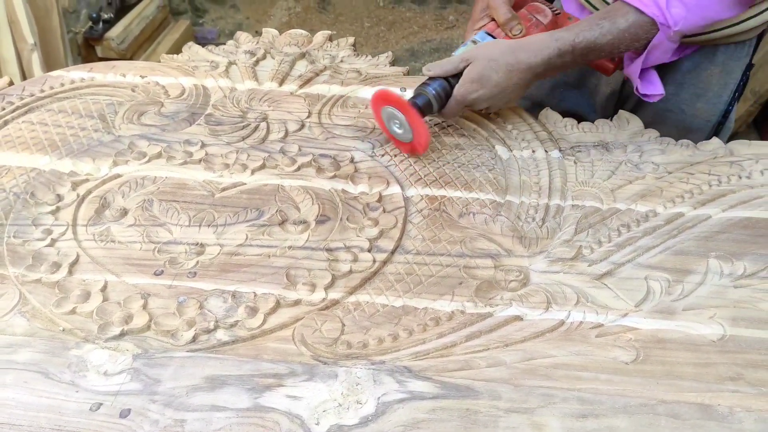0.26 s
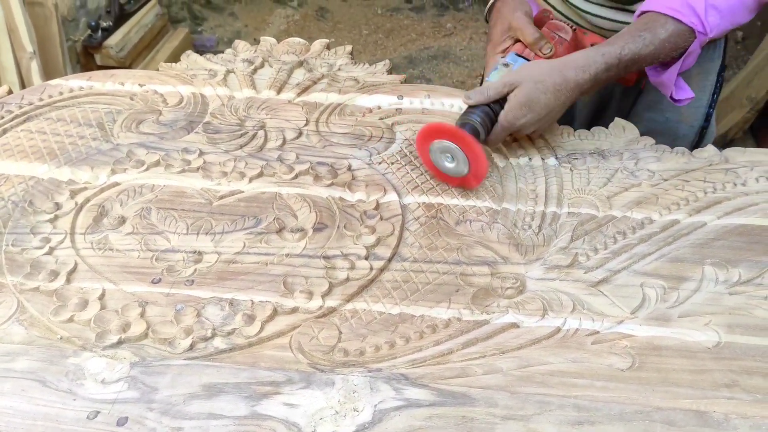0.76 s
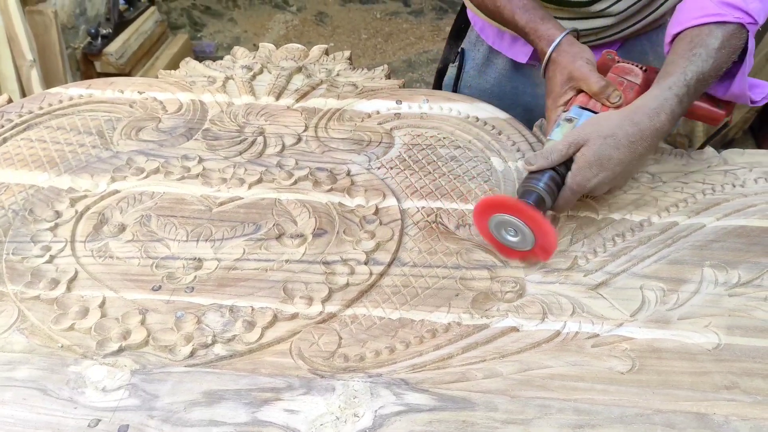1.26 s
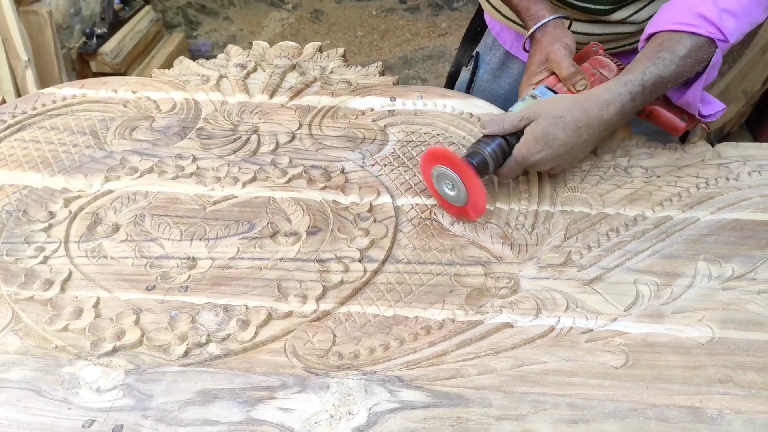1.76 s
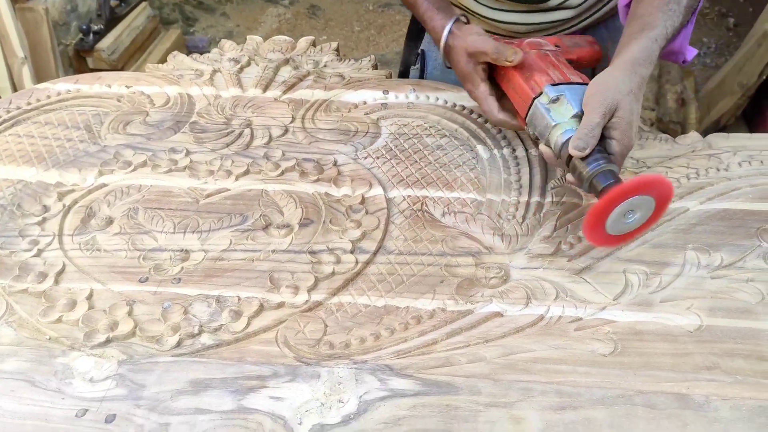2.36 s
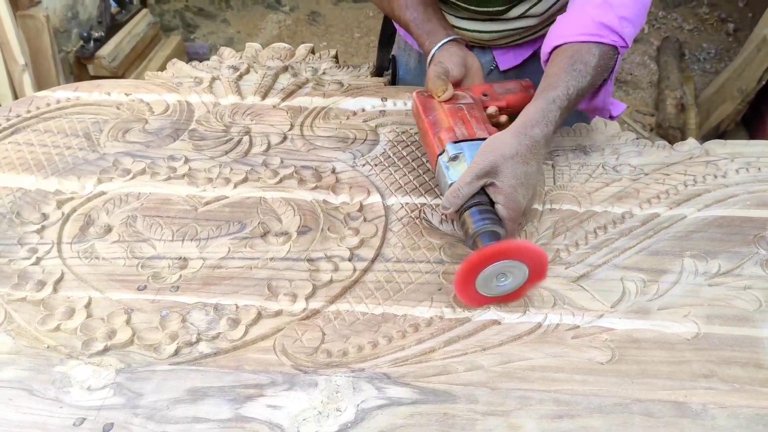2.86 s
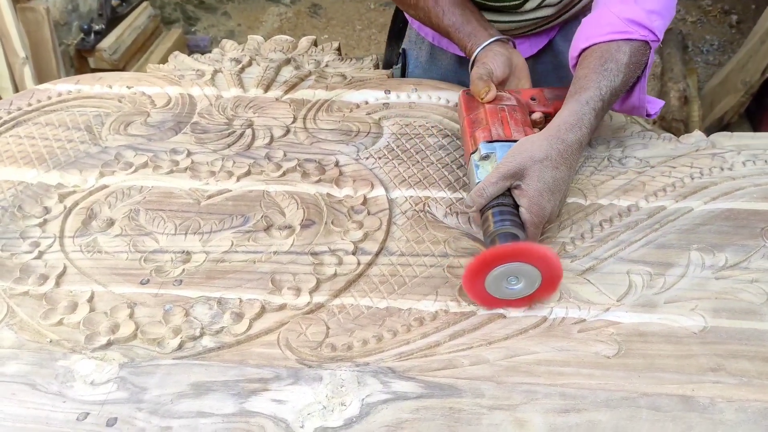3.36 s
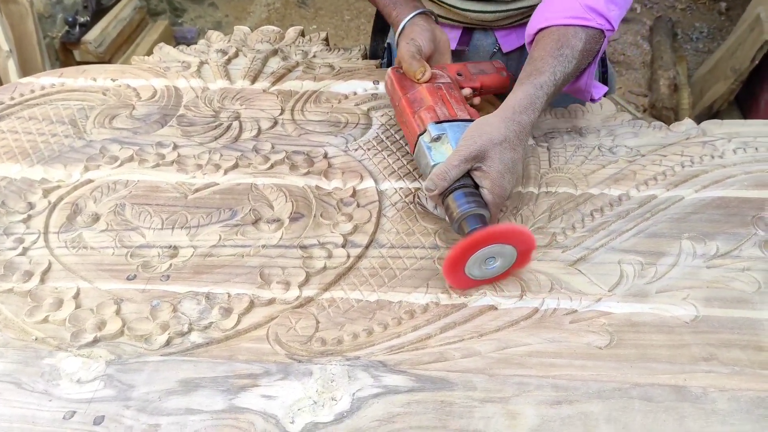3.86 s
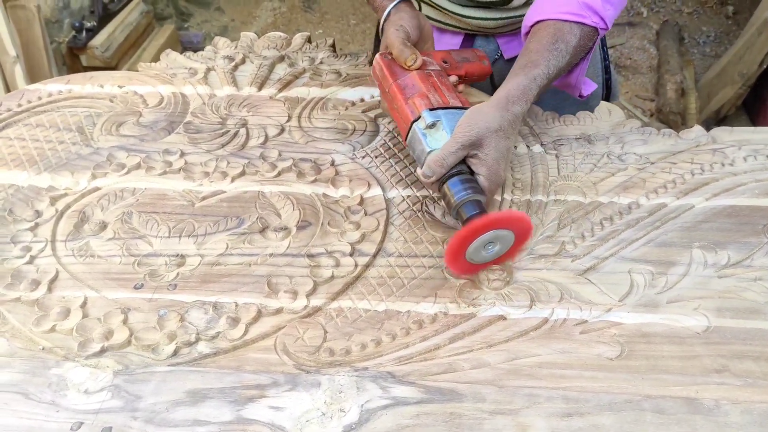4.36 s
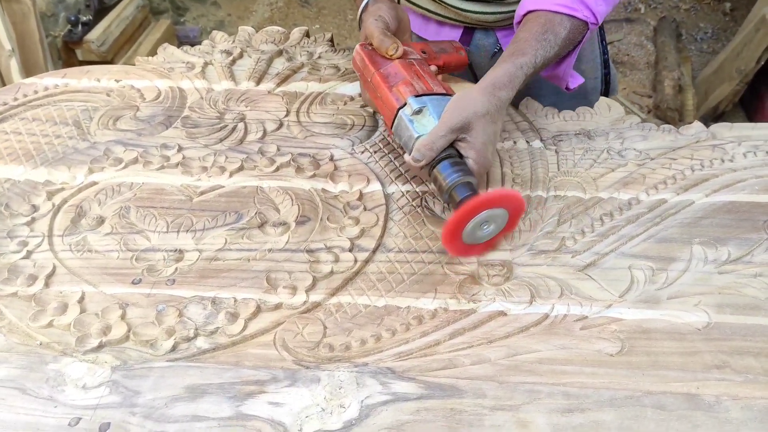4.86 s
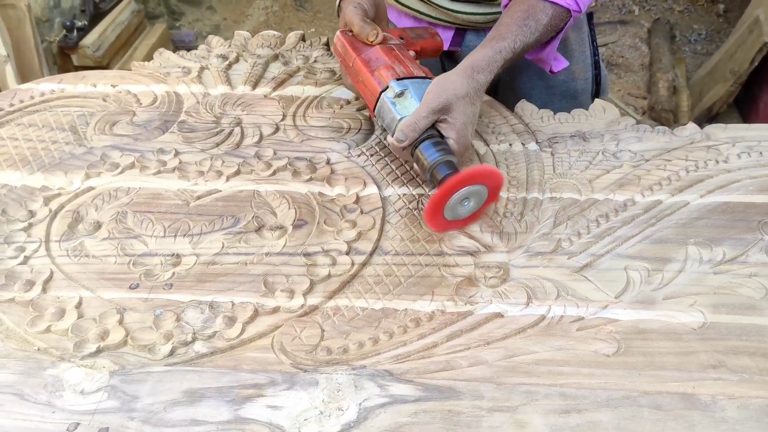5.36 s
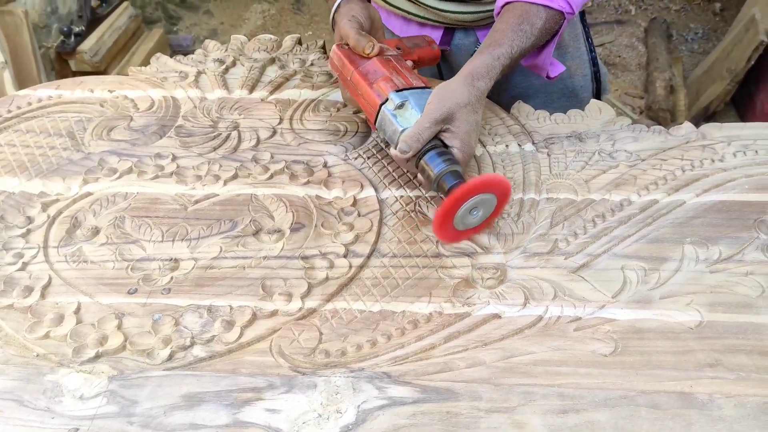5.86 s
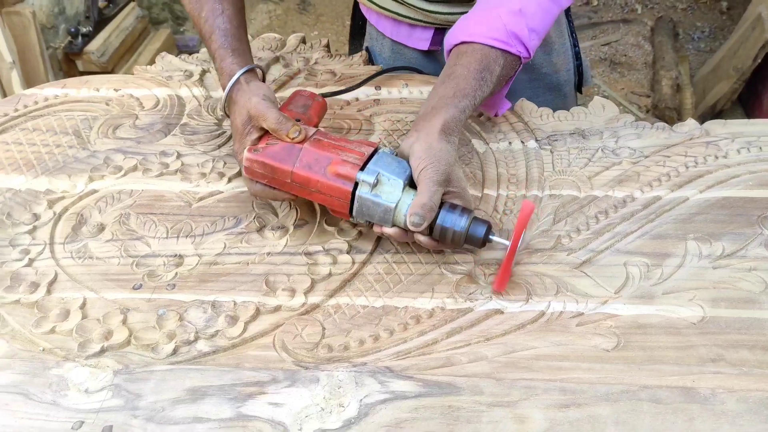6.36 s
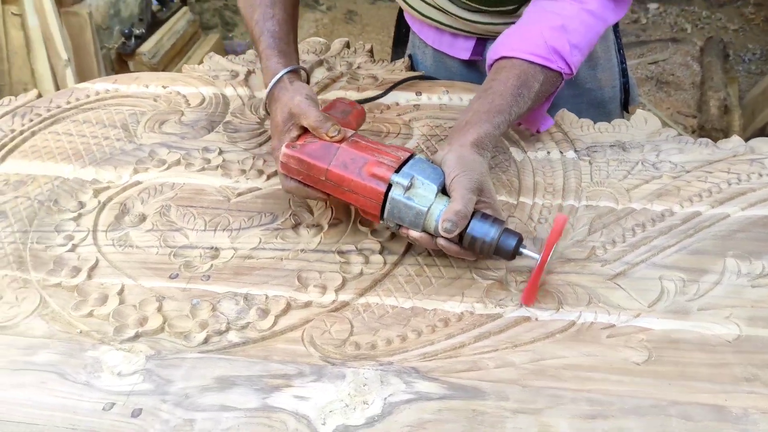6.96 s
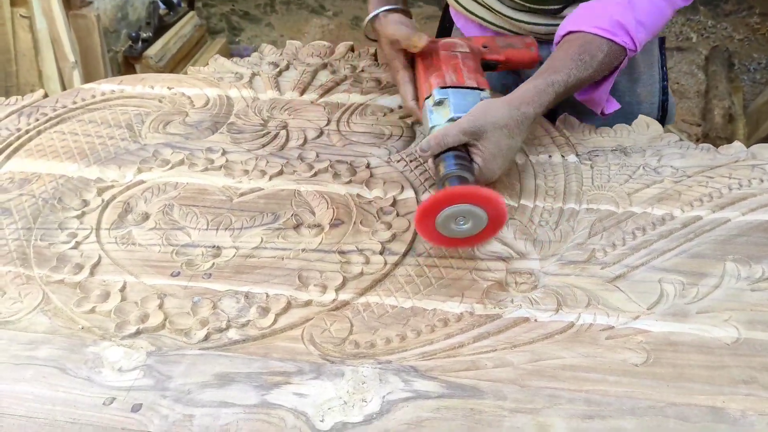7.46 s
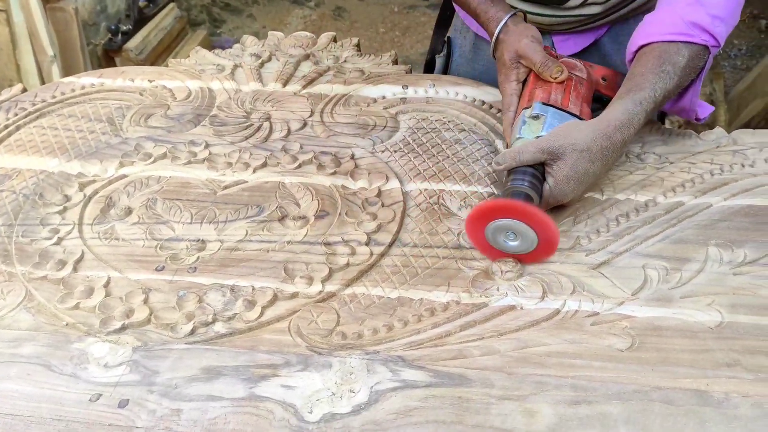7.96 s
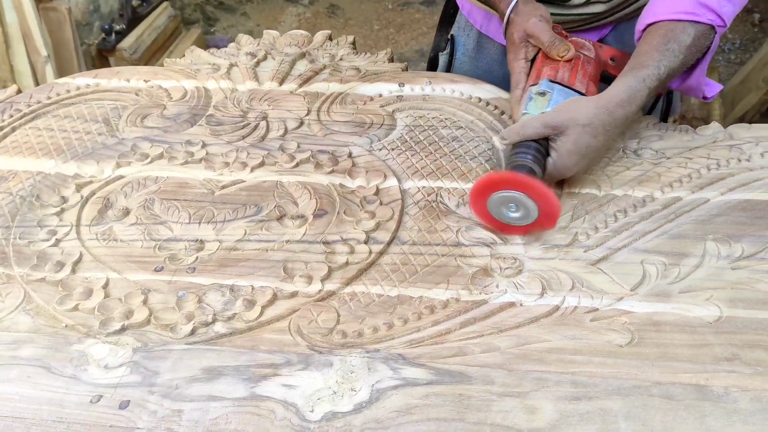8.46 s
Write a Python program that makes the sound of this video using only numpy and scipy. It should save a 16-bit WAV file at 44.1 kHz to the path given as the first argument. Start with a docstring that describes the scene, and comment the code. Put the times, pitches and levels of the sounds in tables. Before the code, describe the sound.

An electric drill is already running at full tilt, close and dry in an open workshop, turning a wheel brush on a carved wooden panel. A shrill gear whine near 3.5 kHz, with higher overtones, swells at each push above a rough bearing drone, gearbox rattle, bright bristle scratch and sizzling hiss. Pitch wobbles through the first two seconds, then climbs from about 2.3 to 2.8 as the brush lifts; the whine thins and airy fan noise grows. From 3 it sinks back and grinds fairly steadily until 5.9. A quick rise at 6.1-6.3 ends in a rougher bite, with a rush of air near 6.4, sagging lowest around 7.2. It races again at 7.4-7.8, then settles under load by 8.1 and continues to the cut at 8.7. Faint panel rumble and booming come and go underneath; tones shift slightly between left and right.

```python
"""An electric drill close by in an open workshop spins a wheel brush over a carved wooden panel.
Its gears whine when the drill is leaned on; with the brush lifted off, the motor races and the whine fades.
Rotor, commutator and bearings add wavering sines, and cooling air is noise that partly repeats each turn.
Bristle scratch, gearbox rattle and spark hiss are shaped noise; behind them the panel rumbles and booms.
Everything is placed for two ears, with levels and lags that follow how the drill is held."""
import sys
import numpy as np
from scipy import signal
from scipy.fft import rfft, irfft, next_fast_len
from scipy.io import wavfile
from scipy.ndimage import uniform_filter1d, map_coordinates

SR = 44100
rng = np.random.default_rng(int(sys.argv[2]) if len(sys.argv) > 2 else 0)


def transcribe(u):
    """Save the signal u as a 16-bit wav file named by the first command-line argument.

    u: samples, shape (n,) or (channels, n), limited to [-1, 1]; the rate is SR.
    q: integer samples, one column per channel.
    """
    v = np.clip(np.atleast_2d(u).T, -1, 1)
    q = np.round(v * 32767).astype(np.int16)
    wavfile.write(sys.argv[1], SR, q)


N = 383669

# Motor speed. Each row: time in seconds, rotor turns per second.
SPEED = [(0,499),(.17,485),(.35,497),(.52,494),(.75,520),(.88,525),(1.05,523),(1.35,492),(1.55,498),(1.78,490),(1.9,503),(2.02,501),(2.28,518),(2.42,556),(2.72,596),(2.9,594),(3.12,543),(3.3,523),(3.62,504),(3.93,499),(4.27,486),(4.51,486),(4.95,501),(5.05,497),(5.37,503),(5.47,493),(5.65,500),(5.78,497),(5.9,512),(6.03,510),(6.22,562),(6.35,574),(6.57,528),(6.7,506),(6.86,491),(7.05,481),(7.22,478),(7.33,495),(7.57,566),(7.8,589),(7.97,543),(8.1,510),(8.36,503),(8.7,500)]
FREE_SPEED, WORK_SPEED = 600, 500   # rotor turns per second at no load and at full load
# How the drill is held. Each row: time in seconds, samples by which the left ear leads,
# dB by which the motor vents face the microphone, dB by which the brush's rim does.
POSE = [(0, 1.4, 4, -0.5), (.9, 1, 12.5, -2.8), (1.4, 3, 11.5, -3.5), (2.2, 2.5, 12.5, -2.2),
        (2.6, 1, 19, 1), (3.1, -0.4, 11.5, 1.1), (3.6, -0.8, 14, -0.7), (4.5, 0, 16.5, -3.5),
        (5.8, 0.8, 16.5, -3), (6.3, -2.5, 11.5, -0.3), (7.1, -2, 17.5, -6.5), (7.5, -1, 8.5, 1),
        (7.9, 2.5, 16, -0.7), (8.7, 2, 1.5, 1)]
# The brush leaves the wood and bites in again.
# Each row: time fully lifted in seconds, landing in seconds, strength of the bite from 0 to 1.
LIFTS = [(2.353, 2.866, 0), (6.106, 6.315, 1.0), (7.427, 7.842, 0)]
LIFT_S, LAND_S, BITE_RISE_S, BITE_DECAY_S = 0.15, 0.1, 0.12, 1

# The drill is leaned on and its gears sing out, heard from where it then points.
# Each row: start and end of the full lean in seconds, then three values each (tooth rate, 2nd and
# 3rd harmonic) of level in dB, left-right difference in dB, and phase lead of the left ear in radians.
LEANS = [(0.016, 0.11, -37.5, -36, -30, 1.0, -1, -7, 1, 3.5, 4.5),
         (0.23, 0.39, -34.5, -34.5, -28, -7, 6, -11, 1.7, 3, 2),
         (0.624, 0.863, -33.0, -37.5, -32, -1.0, 2.0, -0.0, 0.5, 1.7, 0),
         (0.936, 1.187, -31, -37, -27, -5, -0.0, -1, 0.83, 4, -2.5),
         (1.475, 1.574, -32.5, -42, -31, 5, 2.0, -5, 3, 7, -3),
         (1.68, 1.806, -35.5, -42, -27.0, 8, 1.0, -10.0, 4, 1.5, -1.2),
         (1.855, 2.015, -32, -41, -35, 8, -4.0, 0.5, 3, 6, -3),
         (2.095, 2.285, -30.0, -37.0, -34, 1, -6, 0.0, 0.9, 4.5, 1),
         (2.92, 3.03, -38, -34, -27, 0.5, 1.0, 5.0, -0.2, 0, -1),
         (3.143, 3.403, -32.0, -36, -33, 2.0, -4.0, -3, 0.5, -1.5, 1.5),
         (3.478, 3.66, -28.5, -44, -29, -1.0, 2.0, 1.0, 1.67, -0.8, -1),
         (3.745, 4.0, -34, -40, -28.0, 4, 1.0, 2.0, 0.8, -0.5, -1),
         (4.06, 4.344, -36.5, -32, -32.0, 2, 2, -4, 0.7, -1.2, -1.2),
         (4.42, 4.676, -38.0, -33.5, -32.0, 5, 0.5, -2, -2, 0, -0.7),
         (4.808, 5.06, -37, -34.5, -29, 2.0, 4.0, -2, 1.4, -1.9, 4.5),
         (5.13, 5.825, -35.5, -34, -29, -0.5, 3.5, -0.0, 0.5, -2.0, 4.5),
         (5.88, 6.04, -33, -29, -26.5, -2.0, -1.0, 2, 0.3, -3, 3.5),
         (6.467, 6.683, -29.5, -32, -24, -3.0, 4, -2.5, -0.0, -2, -2.5),
         (6.746, 6.98, -32.5, -36.5, -25.5, -9.5, -2, -13, 0.5, -6, -1.8),
         (7.036, 7.312, -30.5, -30.0, -27.5, -7, 1, -9, -1.7, -3, -2.5),
         (7.845, 8.104, -30, -34.5, -25, -7.5, 2.0, -2, 2.5, 1.6, -2.6),
         (8.18, 8.305, -34.0, -35, -36, -6, 5.5, 6.0, 1.4, 4.5, -1),
         (8.375, 8.48, -31.5, -37, -31.0, -3, 14, -2.0, 0.1, 1, 4.5),
         (8.653, 8.7, -36, -36, -29, 0.0, 10, 1, 1.3, 2, 3.5)]
LEAN_ATTACK_S, LEAN_RELEASE_S = 0.059, 0.075
# The gear whine under the tool's own weight. Each entry: level in dB of one harmonic of the tooth rate.
WHINE_DB = [-42.5, -38.5, -45]
UNLOADED_DB = -20   # change of those levels when the motor runs free
PINION_TEETH, WHEEL_TEETH = 7, 44

# Rotor harmonics from unequal teeth. Each row: multiple of rotor speed, dB before load and pose.
SIDEBANDS = [(4, -49), (6, -55), (9, -51.5), (10, -50.5), (15, -52), (16, -42.5), (17, -44.5), (18, -40),
             (19, -41), (20, -36), (22, -51), (23, -33.5), (24, -35.5), (25, -38), (26, -57), (28, -43),
             (30, -43)]
# Commutator bars passing the carbon brushes. Each row: multiple of rotor speed, dB before the pose.
COMMUTATOR = [(12, -50)]
SPARK_SLIP = .28   # share of a cycle by which sparking blurs the commutator tone
# The housing holds back the highest motor tones. Each row: frequency in Hz, gain in dB.
HOUSING = [(12400, -1), (13400, -7), (13900, -4), (14500, 0), (15000, -7), (15600, -14)]

# Rough bearing tones, most of them riding on the tooth rate and its harmonics.
# Each row: multiple of rotor speed, dB before pose, thrust and lift.
BEARING = [(5.5, -54.5), (5.76, -60), (7.24, -51.5), (7.5, -47.5), (8.28, -47.5), (9.76, -43), (11, -40.5),
           (11.26, -43), (12.5, -50.5), (12.76, -50.5), (15.25, -43.5), (16.76, -48), (22.28, -39),
           (23.76, -45)]
BALL_PASSES = 2.76        # per rotor turn
BALL_SLIP = .36           # share of a cycle by which slipping blurs the higher bearing tones
BEARING_LIFTED_DB = -6    # the balls run quieter with the brush off the wood
# Side thrust sets the bearing's outer race droning. Each row: start and end of full thrust in seconds,
# dB of the drone, dB added to the higher bearing tones.
THRUSTS = [(0.02, 0.21, -43.5, -1), (1.146, 1.635, -41.5, 1), (1.705, 2.084, -42, 0.5),
           (2.94, 3.094, -37, 1.5), (3.603, 3.86, -45, 0), (3.955, 4.774, -40.5, 1.5),
           (4.98, 5.796, -42.5, 0), (6.375, 6.497, -35.5, 2), (6.75, 7.25, -43, -1.5),
           (8.036, 8.678, -39.5, -1.5)]
THRUST_RAMP_S, DRONE_REST_DB = 0.05, -51.5

# Spectrum of the cooling air at the side slots. Each row: frequency in Hz, relative dB per Hz.
VENT = [(5500, -50), (7000, -21), (7700, -8), (8600, -9), (9400, -1), (11000, -45)]
# Cooling air, loudest with the drill side-on. Each row: time in seconds, level in dB.
VENT_LEVEL = [(0, -50), (2.35, -44), (2.55, -31), (3.1, -39), (3.7, -47), (5.8, -60), (6.15, -43),
              (6.42, -24.5), (6.7, -31), (7.15, -32.5), (7.65, -34), (8.7, -40)]
FAN_MEMORY = .45   # share of the air's rush that repeats from turn to turn

# Spectrum of the bristles on the carving. Each row: frequency in Hz, relative dB per Hz.
SCRATCH = [(200, -65), (700, -33), (1500, -5.5), (2000, -2.5), (2500, -1.5), (3300, -1), (3900, -2),
           (4500, -3), (5600, -0.5), (6500, -4.5), (7700, 0), (9000, -0.5), (12000, -33)]
# Spectrum of the gearbox rattle. Each row: frequency in Hz, relative dB per Hz.
RATTLE = [(30, -52), (80, -48), (125, -27), (200, -20), (300, -14.5), (450, -8.5), (620, -12), (800, -6.5),
          (1000, 0), (1300, 2.5), (1650, -3), (2300, -5.5), (4000, -24.5)]
# Spectrum of the spark hiss. Each row: frequency in Hz, relative dB per Hz.
HISS = [(6000, -55), (8000, -31), (8800, -9), (9500, 10), (10300, 13), (11300, 11.5), (12200, 2),
        (12900, 7.5), (13500, -21), (14300, -4.5), (15600, -22)]
# Level of each noise. Entries: dB at working speed, then dB added when racing, when lifted off,
# by a full bite, by leaning, and per dB of the vents' facing.
SCRATCH_LAW = (-32, 0.4, -2.5, 2.5, -0.5, 0.21)
RATTLE_LAW = (-36.5, 3, -0.5, 0.5, 0.5, 0.0072)   # gearbox rattle, same entries
HISS_LAW = (-25.5, -0.5, -3, 2, -0.57, 0.2742)   # spark hiss, same entries
# Strokes that press the bristles deeper or ease them off. Each row: start and end of the full stroke
# in seconds, dB added to the rattle, to the scratch, to the hiss.
STROKES = [(.08, 0.15, 0, 0.78, 0.76), (.28, .52, -0.5, -0.081, 1.8), (0.603, 0.717, -2, -0.55, -0.52),
           (0.937, 1.21, 0, 0.76, 1.1), (1.15, 1.2, 0.5, 0.12, 1.5), (1.42, 1.55, 0, 0.74, -1.9),
           (1.76, 1.95, 1, -1.1, -0.93), (2.5, 2.847, 0, -0.2, -0.3), (3.518, 3.6, 1.5, 0.29, 1.7),
           (3.92, 4.06, 0, -0.093, 0.35), (4.26, 4.42, 0, 0.3, -.5), (4.576, 4.9, 0.1, -0.84, 0.08),
           (5.88, 6.007, 0.5, 0.8, 0.43), (6.085, 6.162, -1.5, 1.5, -0.51), (6.343, 6.48, 0, 0.33, -0.18),
           (6.7, 7.177, 0.5, 1.2, 1.3), (7.617, 7.85, 0.8, -1.9, -1.1), (8.55, 8.7, 2, -0.87, -1)]
STROKE_RAMP_S = 0.048
SCRATCH_PATCHY_DB, HISS_PATCHY_DB, RIDGES_PER_S = 1.44, 1, 6.9

# The panel shaking as a whole. Each row: frequency in Hz, relative dB per Hz.
RUMBLE = [(15, -11), (35, 1), (60, -4), (120, -2), (250, -6), (1000, -64)]
# The panel's low modes boom under the brush. Each row: frequency in Hz, width in Hz, dB before drumming.
PANEL = [(162.6, 13.3, -71.5), (259, 20.5, -68.5)]
# How hard the brush drums on the panel. Each row: time in seconds, dB.
DRUMMING = [(0, 1), (.5, 3), (1, -2), (2.9, -10), (3.25, 10.5), (3.6, 1), (3.9, 3), (4.6, 7), (5.9, -1),
            (6.2, -15), (6.6, 8), (7, -1), (7.25, 6), (7.5, -15), (8, 11), (8.7, -0.5)]
RUMBLE_SWING_DB = 5.5

# Noise at the two ears, before the lag. Each row: frequency in Hz, left-right likeness from -1 to 1.
LIKENESS = [(40, 0.58), (130, 0.96), (300, 0.91), (1000, 0.87), (2000, 0.35), (3200, 0.82), (5000, 1),
            (7000, 1), (9000, 0.38), (10300, 0.68), (11500, 0.72), (15000, -0.88)]
# Tilt of the noise between the ears. Each row: frequency in Hz, left-right difference in dB.
BALANCE = [(100, 1), (700, 2.5), (1400, 1.5), (3000, -2), (6000, 2), (8500, 0.5), (10000, -3.5), (11800, 7),
           (13000, -1.5), (14500, 14)]
CUTOFF_HZ = 15550


def gears(turns, load, flutter_db, grit_db, swell_db):
    """Pinion teeth strike the wheel: the whine sings out at each lean and fades when the motor runs free."""
    leans, (lifted, _) = leaning(), contact()
    rows = np.array(LEANS)
    leaned_db, pans_db, lags = np.split(rows[:, 2:].T, 3)
    resting = 1 - leans.sum(axis=0)
    free = np.maximum(1 - load, lifted ** 2)

    def aimed(column):
        """Steady in a lean, gliding to the next."""
        return np.interp(np.arange(N) / SR, rows[:, :2].ravel(), np.repeat(column, 2))

    out = 0
    harmonics = zip(WHINE_DB, leaned_db, pans_db, np.unwrap(lags))
    for k, (rest_db, lean_db, pan_db, lag) in enumerate(harmonics, 1):
        level_db = lean_db @ leans + resting * (rest_db + UNLOADED_DB * free)
        level_db = level_db + flutter_db * drift(37) + grit_db * drift(71)
        level_db = level_db + swell_db * (1 + 2.0 * resting) * drift(4.4)   # swells more between leans
        pan = aimed(pan_db) + 0.64 * k * drift(3.9)
        phase = aimed(lag) + 0.21 * k * drift(9.6)
        out = out + tone(k * PINION_TEETH * turns, level_db, pan, phase)
    return out


def tooth_sidebands(turns, load, facing_db):
    """Unequal teeth add rotor harmonics that grow with load and drop with the brush off the wood."""
    lifted, _ = contact()
    level_db = 15 * (load - 1) - 5 * lifted + 0.053 * facing_db + 0.35
    return rotor_tones(SIDEBANDS, turns, level_db, slip=0.14)


def commutator(turns, facing_db):
    """Commutator bars pass the carbon brushes, their tone blurred by sparking."""
    return rotor_tones(COMMUTATOR, turns, facing_db - 4.5, slip=SPARK_SLIP)


def imbalance_hum(turns, load):
    """The rotor's slight imbalance hums close to once a turn, weaker under load."""
    return rotor_tones([(0.99, -52.5)], turns, -7.5 * load, slip=0.018)


def bearings(turns, facing_db):
    """Slipping balls make rough tones, mostly between the rotor harmonics; thrust brings out the drone."""
    lifted, bite = contact()
    thrusts = [(held(start, end, THRUST_RAMP_S, THRUST_RAMP_S), db, upper_db)
               for start, end, db, upper_db in THRUSTS]
    drone_db = DRONE_REST_DB + sum((db - DRONE_REST_DB) * share for share, db, _ in thrusts)
    grind_db = BEARING_LIFTED_DB * lifted + sum(upper_db * share for share, _, upper_db in thrusts)
    cycles = BALL_PASSES * turns + (0.035 + 0.1 * bite) * drift(24)   # rougher as the brush bites
    grain_db = 3 * drift(70)
    drone = tone(cycles, drone_db + grain_db, 3.6 + 0.85 * drift(5.8), 0.83 * drift(0.27))
    return drone + rotor_tones(BEARING, turns, 0.37 * facing_db + grind_db - 5.5, slip=BALL_SLIP)


def rotor_tones(table, turns, level_db, slip):
    """Tones tied to the rotor; each wavers in level and place, and slip blurs its pitch."""
    out = 0
    for multiple, db in table:
        scatter = min(multiple / 12, 1.4)   # short waves reach the two ears less alike
        cycles = multiple * turns + slip * drift(29.0)
        fade_db = 2.8 * drift(10)
        out = out + tone(cycles, db + level_db + fade_db, 1.6 * drift(1.7), scatter * drift(17.0))
    return out


def through_housing(x):
    """The casing filters the motor tones, holding back the highest."""
    size = next_fast_len(N)
    hz = np.maximum(np.fft.rfftfreq(size, 1 / SR), 1)
    return irfft(rfft(x, size) * from_db(at_hz(HOUSING, hz)), size)[:, :N]


def cooling_air(speed):
    """The fan chops its air on every turn and blows it out through the side slots."""
    level_db, = in_time(VENT_LEVEL)
    air = turn_by_turn(rng.standard_normal((2, N)), speed, memory=FAN_MEMORY)
    return from_db(level_db) * coloured(VENT, air)


def bristle_scratch(speed, turns, load, facing_db, rim_db):
    """Bristles flick over the carving, partly alike from turn to turn, patchy as they cross the ridges."""
    flicks = turn_by_turn(rng.standard_normal((2, N)), speed, memory=0.27)
    flicks = flicks * from_db(2.4 * drift(220) + .4 * spindle_swing(turns) * load)
    scratch = off_the_panel(coloured(SCRATCH, flicks), delay_s=.0011, sway=0.196, echo=0.86)
    level_db = noise_level(SCRATCH_LAW, 1, load, facing_db)
    level_db = level_db + 1.22 * rim_db + SCRATCH_PATCHY_DB * drift(RIDGES_PER_S)
    return from_db(level_db) * scratch


def gearbox_rattle(turns, load, facing_db):
    """Loose noise from the gearbox, swelling once per turn of the spindle."""
    jitter = from_db(0.8 * drift(47) + .6 * spindle_swing(turns))
    rattle = coloured(RATTLE, rng.standard_normal((2, N)) * jitter)
    return from_db(noise_level(RATTLE_LAW, 0, load, facing_db)) * rattle


def spark_hiss(speed, turns, load, facing_db, rim_db):
    """Hiss that pulses once and twice a rotor turn as the two carbon brushes spark."""
    sparks_db = 0.5 * np.cos(2 * np.pi * 2 * turns) + 0.82 * np.cos(2 * np.pi * turns) + 0.52 * drift(31)
    noise = turn_by_turn(rng.standard_normal((2, N)), speed, memory=0.24)
    hiss = coloured(HISS, noise * from_db(sparks_db))
    hiss = off_the_panel(hiss, delay_s=.0016, sway=0.111, echo=0.73)
    level_db = noise_level(HISS_LAW, 2, load, facing_db)
    level_db = level_db + rim_db + HISS_PATCHY_DB * drift(RIDGES_PER_S)
    return from_db(level_db) * hiss


def noise_level(law, stroke_column, load, facing_db):
    """Level in dB that follows speed, lift, bite, lean, the vents' facing and the strokes."""
    work_db, race_db, lift_db, bite_db, lean_db, aim = law
    (lifted, bite), leaned = contact(), leaning().sum(axis=0)
    level_db = work_db + race_db * (1 - load) + lift_db * lifted + bite_db * bite
    level_db = level_db + lean_db * leaned + aim * facing_db
    return level_db + sum(db[stroke_column] * held(start, end, STROKE_RAMP_S, STROKE_RAMP_S)
                          for start, end, *db in STROKES)


def spindle_swing(turns):
    """A sine once per turn of the spindle, geared down from the rotor."""
    return np.sin(2 * np.pi * turns / WHEEL_TEETH * PINION_TEETH)


def turn_by_turn(noise, speed, memory):
    """The same surfaces rub on every turn, so the noise partly repeats and gathers at rotor harmonics."""
    n = np.arange(N)
    rubbed = sum(memory ** k * noise[:, n - np.round(k * SR / speed).astype(int)] for k in range(3))
    return rms_one(rubbed)


def off_the_panel(x, delay_s, sway, echo):
    """The carving throws back three echoes whose delays shift as the tool moves, differently at each ear."""
    n = np.arange(N)
    out = x
    for k in range(1, 4):
        back = [np.interp(n - SR * delay_s * (k + sway * drift(1.115)), n, ear, left=0, right=0) for ear in x]
        out = out + echo / np.sqrt(k) * np.array(back)
    return rms_one(out)


def panel():
    """The brush shakes the panel in fits and starts and keeps its low modes ringing."""
    drumming_db, = in_time(DRUMMING)
    shaking_db = -71.5 + 0.49 * drumming_db + RUMBLE_SWING_DB * np.minimum(drift(8.9), 1)
    out = from_db(shaking_db) * coloured(RUMBLE, rng.standard_normal((2, N)))
    for hz, width, db in PANEL:
        mode = signal.butter(2, [hz - width / 2, hz + width / 2], "band", fs=SR, output="sos")
        ringing = rms_one(signal.sosfilt(mode, rng.standard_normal(N)))
        out = out + from_db(db + drumming_db) * ringing
    return out


def contact():
    """How far the brush is off the wood, and the bite that rises around each landing and dies away."""
    t = np.arange(N) / SR
    lifted, bite = 0, 0
    for lift, landing, strength in LIFTS:
        lifted = lifted + held(lift, landing - LAND_S, LIFT_S, LAND_S)
        rise = np.clip((t - landing) / BITE_RISE_S + .5, 0, 1)
        decay = np.exp(-np.maximum(t - landing - BITE_RISE_S, 0) / BITE_DECAY_S)
        bite = bite + strength * rise * decay
    return lifted, bite


def leaning():
    """The share of each lean at every moment; neighbours cross-fade."""
    each = np.array([held(start, end, LEAN_ATTACK_S, LEAN_RELEASE_S) for start, end, *_ in LEANS])
    return each / np.maximum(each.sum(axis=0), 1)


def held(start, end, attack_s, release_s):
    """An envelope that has risen to 1 by start, holds, and falls after end."""
    t = np.arange(N) / SR
    return np.clip(np.minimum((t - start) / attack_s, (end - t) / release_s) + 1, 0, 1)


def tone(cycles, level_db, pan_db, lag):
    """A stereo sine; level is the rms over both ears, lag is the left ear's phase lead in radians."""
    ear = np.array([[1], [-1]], np.float32)
    gain = np.exp(ear * (pan_db * np.log(10) / 40).astype(np.float32))   # half the dB at each ear
    gain /= np.sqrt(np.mean(gain ** 2, axis=0))
    angle = (2 * np.pi * (cycles % 1)).astype(np.float32) + ear * lag.astype(np.float32) / 2
    return np.sqrt(2) * from_db(level_db) * gain * np.sin(angle)


def coloured(spectrum, excitation):
    """Two unrelated noises become stereo noise shaped by the given spectrum; rms 1."""
    size = next_fast_len(N)
    hz = np.maximum(np.fft.rfftfreq(size, 1 / SR), 1)
    alike = np.clip(at_hz(LIKENESS, hz), -1, 1)
    ear = np.array([[1], [-1]])
    mid, side = rfft(excitation, size) * from_db(at_hz(spectrum, hz))
    both = np.sqrt(1 + alike) * mid + ear * np.sqrt(1 - alike) * side
    both = both * from_db(ear * at_hz(BALANCE, hz) / 2)
    return rms_one(irfft(both, size)[:, :N])


def toward_the_ears(x, lead):
    """Sound from off centre reaches one ear a little before the other."""
    n = np.arange(N)
    return np.array([map_coordinates(ear, [n + sign * lead / 2], order=3, mode="mirror")
                     for ear, sign in zip(x, (1, -1))])


def drift(rate):
    """Smooth chance of spread 1 that changes about rate times a second."""
    r = np.exp(-80 * np.pi * rate / SR)   # drawn at every 40th sample
    slow = signal.lfilter([1], [1, -2 * r, r * r], rng.standard_normal(N // 40 + 2002))[2000:]
    return np.interp(np.arange(N) / 40, np.arange(len(slow)), rms_one(slow))


def in_time(rows):
    """Each column of a curve, sample by sample."""
    s, *columns = np.transpose(rows)
    return [np.interp(np.arange(N) / SR, s, c) for c in columns]


def at_hz(points, hz):
    """Read a spectrum on a log-frequency axis."""
    f, value = np.transpose(points)
    return np.interp(np.log(hz), np.log(f), value)


def from_db(db):
    """Decibels to gain."""
    return 10 ** (np.asarray(db) / 20)


def rms_one(x):
    """Scale to rms 1."""
    return x / np.sqrt(np.mean(x ** 2) + 1e-20)


def scene():
    """Motor speed sets every rotor tone; the more it sags, the greater the load. Pose sets direction."""
    speed, = in_time(SPEED)
    lead, facing_db, rim_db = in_time(POSE)
    speed = uniform_filter1d(speed, size=1500, mode="nearest")
    load = np.clip((FREE_SPEED - speed) / (FREE_SPEED - WORK_SPEED), 0, 1)
    turns = np.cumsum(speed * (1 + 0.000667 * drift(35.0))) / SR   # the carving jolts the brush

    whine = gears(turns, load, flutter_db=1.5, grit_db=1.0, swell_db=1.0)   # carries its own lags
    motor = through_housing(tooth_sidebands(turns, load, facing_db) + commutator(turns, facing_db))
    motor = motor + imbalance_hum(turns, load) + bearings(turns, facing_db) + cooling_air(speed)
    rush = bristle_scratch(speed, turns, load, facing_db, rim_db)
    rush = rush + gearbox_rattle(turns, load, facing_db)
    rush = rush + spark_hiss(speed, turns, load, facing_db, rim_db)
    return whine + toward_the_ears(motor + rush + panel(), lead)


def record(dry):
    """The microphone signal ends in a steep low-pass."""
    return signal.sosfilt(signal.ellip(12, .1, 80, CUTOFF_HZ, fs=SR, output="sos"), dry)


dry = scene()
out = record(dry)
transcribe(out)
```